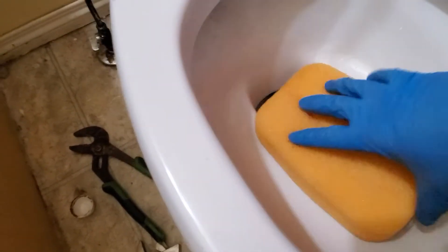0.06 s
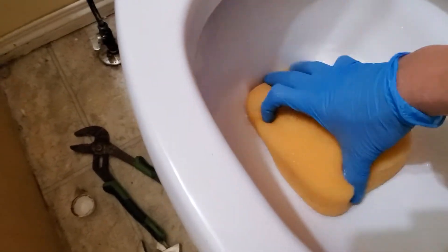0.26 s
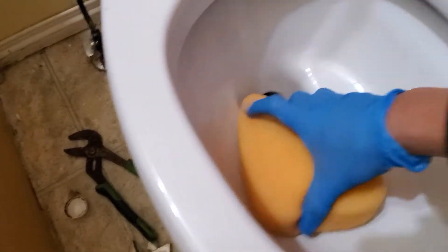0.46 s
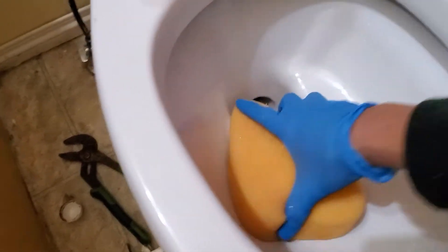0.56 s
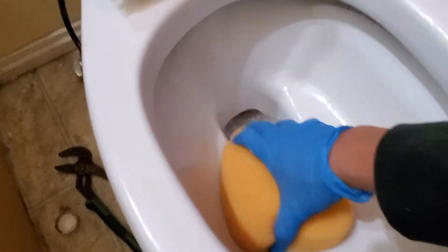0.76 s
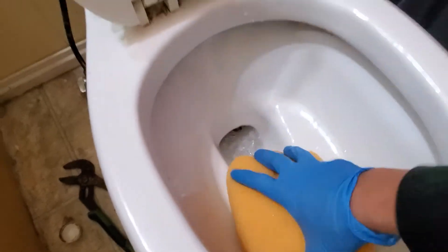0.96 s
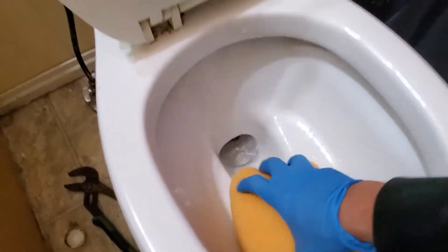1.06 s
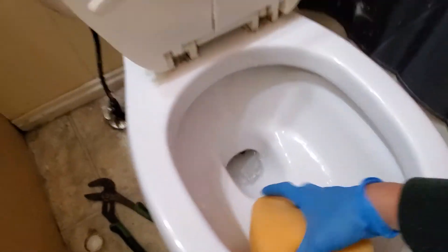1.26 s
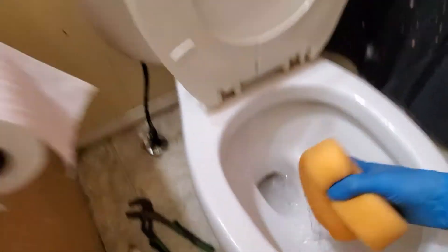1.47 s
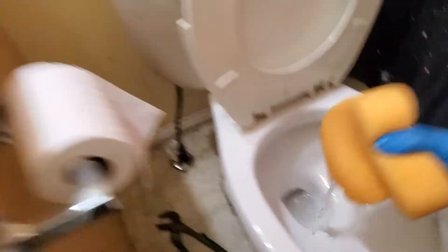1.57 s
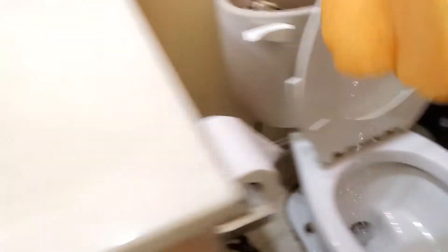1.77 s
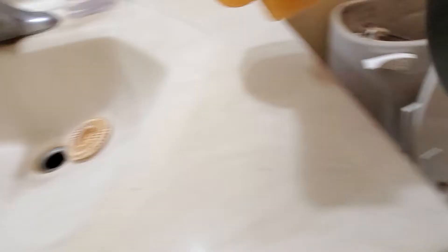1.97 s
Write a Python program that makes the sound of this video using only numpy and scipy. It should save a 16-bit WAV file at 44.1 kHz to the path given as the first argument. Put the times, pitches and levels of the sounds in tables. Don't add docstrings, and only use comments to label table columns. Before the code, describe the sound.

Water gurgles and foam squishes in a hollow toilet bowl, with slaps fading to sparse drops

```python
import sys
import numpy as np
from scipy import signal
from scipy.fft import rfft, irfft
from scipy.io import wavfile
from scipy.ndimage import uniform_filter1d

SR = 44100
rng = np.random.default_rng(int(sys.argv[2]) if len(sys.argv) > 2 else 0)


def rack_gain(trim_db):
    fader = np.asarray(trim_db, float)
    return 10 ** (fader / 20)


def materialize(psi):
    bounded = np.clip(np.atleast_2d(psi).T, -1, 1)
    quanta = np.round(bounded * 32767).astype(np.int16)
    wavfile.write(sys.argv[1], SR, quanta)


N = 88200

# frequency in Hz, level in dB per Hz.
ROOM_SPECTRUM = [(20, -6), (75, -2), (201, -5.5), (287, -9.5), (409, -4.5), (677, -10.5), (3000, -37),
                 (4500, -82.5)]
# time in seconds, level in dB.
GRIP_LEVEL = [(0, -54), (.07, -43), (.12, -49.5), (.2, -63), (.27, -36.5), (.34, -50.5), (.42, -59),
              (.84, -54), (.95, -65), (1.03, -55.5), (1.3, -75), (1.46, -57), (2, -60)]
# time in seconds, level in dB.
WATER_LEVEL = [(0, -51), (.12, -59), (.2, -53), (.26, -45), (.33, -40.5), (.41, -35.5), (.47, -39.5),
               (.56, -49), (.625, -39), (.71, -50.5), (.8, -43), (1.04, -58), (1.085, -45.5), (1.22, -61),
               (1.4, -62), (1.59, -52.5), (1.86, -65.5), (2, -76)]
# time in seconds, level in dB.
SQUEEZE_LEVEL = [(0, -52.5), (.12, -58), (.2, -51.5), (.262, -58), (.31, -46), (.41, -45.5), (.46, -54),
                 (.51, -51.5), (.575, -60), (.67, -50), (.7, -64), (.745, -58), (.8, -55), (1.04, -58.5),
                 (1.22, -63.5), (1.42, -65), (1.59, -60), (2, -66)]
# frequency in Hz, width in Hz, level in dB.
BOWL_MODES = [(240, 10, -11), (300, 38.3, 4), (371, 206, 3), (589, 140, -1), (760, 390, -5),
              (1090, 260, -55)]
# frequency in Hz, level in dB per Hz.
FOAM_SPECTRUM = [(710, -14.5), (1200, 5.5), (1770, 0), (2720, 3), (3820, 0.5), (6610, -7), (8000, -20),
                 (14000, -82.5)]
# frequency in Hz, level in dB per Hz.
HISS_SPECTRUM = [(1000, -28), (2500, -17), (6500, -7.5), (7400, -15.5), (9000, -11), (15800, -3.5)]
# start in seconds, peak in dB, spread in seconds, splash in dB, thud in dB.
SLAPS = [
    (.366, -5.5, 0.0042, -20.5, -20),
    (0.7615, -17, 0.0039, -26, -13.5),
]
# frequency in Hz, level in dB, 60 dB decay in seconds.
FIRST_SLAP_MODES = [(275, -14.5, 0.022), (554, 1, 0.012), (806, 2.5, 0.014), (1180, -10, 0.014),
                    (2120, -16.5, 0.11), (2363, -5, 0.026), (2740, -3, 0.012), (4070, -8.5, 0.0076),
                    (5100, -14, 0.036), (6390, -12, 0.012)]
# frequency in Hz, level in dB, 60 dB decay in seconds.
SECOND_SLAP_MODES = [(344, 1.5, 0.061), (693, 3.5, 0.018), (1094, -1, 0.023), (1960, -19, 0.035),
                     (2620, -4.5, 0.0044)]
# time after its start in seconds, level in dB.
SLAP_BLOWS = [
    [(.0002, -12), (.002, -7), (.0034, -12), (.0044, 5), (.0072, -2.5)],
    [(.0012, -11), (.0024, 4.5), (.0043, -8)],
]
# start in seconds, peak in dB, pitch in Hz, length in seconds.
GLUGS = [(.167, -32.5, 321, 0.019), (.179, -39, 200, 0.024), (.208, -39, 295, 0.023),
         (.2415, -23.5, 278, 0.016), (.255, -30.5, 240, 0.012), (.266, -28.5, 298, 0.016),
         (.283, -32.5, 215, 0.033), (.305, -37.5, 240, 0.054), (.33, -33, 417, 0.022),
         (.346, -39, 275, 0.035), (.369, -22, 275, 0.0075), (.381, -28.5, 795, 0.02),
         (.392, -23.5, 760, 0.011), (.398, -24.5, 307, 0.029), (.41, -25.5, 797, 0.016),
         (.423, -36, 715, 0.023), (.449, -30.5, 400, 0.01), (.525, -36, 394, 0.017),
         (.571, -40.5, 795, 0.0098), (.586, -38, 354, 0.012), (.595, -35.5, 398, 0.019),
         (.609, -39, 303, 0.033), (.612, -32.5, 557, 0.028), (.624, -44, 325, 0.017),
         (.634, -34.5, 434, 0.014), (.649, -37.5, 300, 0.0082), (.677, -47, 300, 0.0082),
         (.765, -21.5, 325, .012), (.783, -32, 347, 0.02), (.801, -36, 320, .02), (.816, -37, 333, 0.018),
         (.952, -42.5, 766, 0.018), (1.019, -41, 300, 0.02), (1.066, -34.5, 311.4, 0.039),
         (1.063, -43.5, 607, 0.035), (1.072, -41.5, 769, 0.03), (1.07, -50.5, 1070, 0.044),
         (1.104, -41, 282, 0.02), (1.161, -43, 304, 0.013)]
# start in seconds, peak in dB, pitch in Hz, 60 dB decay in seconds.
DROPS = [(.391, -24, 2870, .015), (.397, -20, 3140, 0.0065), (.404, -24.5, 2920, 0.049),
         (.485, -40, 5420, 0.026), (.5076, -39, 13000, 0.045), (.5705, -44, 1540, .015),
         (.5716, -44, 2750, 0.013), (.6749, -37, 2470, 0.0086), (.7846, -37.5, 2910, 0.034),
         (.8543, -45, 6120, 0.029), (1.163, -49, 1670, 0.018), (1.256, -49, 4550, 0.042),
         (1.299, -46.5, 13140, 0.03), (1.55, -49.5, 4950, 0.025), (1.7938, -48, 12000, 0.048),
         (1.8515, -39, 9980, 0.021), (1.858, -55, 4250, 0.015), (1.869, -33, 12560, 0.015),
         (1.889, -38, 13500, .012), (1.947, -56, 6400, .015), (1.9832, -53, 14300, .012),
         (1.989, -51, 12600, 0.013), (1.9925, -51, 12300, 0.0091)]
# start in seconds, length in seconds, level in
# dB, pitch in Hz, width in Hz.
WHISTLES = [(.262, 0.23, -48, 3900, 810), (1.16, 0.2, -61.5, 325, 20), (1.47, 0.068, -55.5, 31, 12),
            (1.54, 0.16, -66, 1780, 450), (1.575, 0.056, -66, 1498, 33), (1.54, 0.12, -62, 13710, 980),
            (1.715, 0.068, -69.5, 910, 25), (1.745, 0.032, -64, 5230, 330),
            (1.866, 0.064, -64.5, 3205, 380), (1.866, 0.11, -72, 1260, 190)]
# start in seconds, peak in dB, pitch in Hz, length in seconds.
PLINKS = [(1.8675, -52.5, 1300, 0.014), (1.878, -44, 1326, 0.024), (1.902, -55, 1266, .022),
          (1.92, -63.5, 1250, 0.015), (1.94, -71, 1306, 0.019)]
# time in seconds, pitch in Hz, level in dB.
SQUEAKS = [
    [(1.15, 1680, -87), (1.17, 1665, -67), (1.27, 1820, -66.5), (1.35, 1870, -80)],
    [(1.365, 1810, -66), (1.39, 1850, -62.5), (1.45, 1735, -64), (1.55, 1830, -65), (1.6, 1865, -60),
     (1.66, 1820, -76), (1.72, 1750, -88), (1.8, 1840, -84), (1.83, 1840, -98)],
]
# frequency in Hz, gain in dB.
LIFTED_COLOUR = [(700, -1.5), (1250, -10), (1800, -5), (2700, -12.5), (3600, -2.5), (7500, -2.5),
                 (11000, 0.5)]
# frequency in Hz, gain in dB.
GRIP_SHADE = [(1200, 0), (4500, -7)]
# frequency in Hz, correlation from 0 to 1.
PORT_LIKENESS = [(20, 0.25), (70, 0.92), (500, 0.82), (1500, 0.19), (4000, 0.28), (9000, .2)]
# frequency in Hz, left minus right in dB.
MUFFLE = [(60, -1.5), (280, 1), (600, 0), (1300, 5), (2400, 13), (4400, 21), (7000, 29), (15000, 32)]
# frequency in Hz, left's lead in radians.
LEFT_LEAD = [(20, .1), (300, .32), (950, 1.1), (1810, .6), (2840, 1.6), (4000, .2)]


def evened(x):
    return x / np.sqrt(np.mean(x ** 2) + 1e-20)


def read(points, hz):
    f, value = np.transpose(points)
    return np.interp(np.log(hz + 1), np.log(f + 1), value)


def curve(table, share=0.99):
    s, db = np.transpose(table)
    level = np.interp(np.arange(N) / SR, s, db)
    return rack_gain(share * (level + 55) - 55.5)


def add(mix, s, sound):
    part = mix[..., round(s * SR):][..., :sound.shape[-1]]
    part += sound[..., :part.shape[-1]]


def colour(x, table):
    size = x.shape[-1]
    gain = rack_gain(read(table, np.fft.rfftfreq(size, 1 / SR)))
    return irfft(rfft(x) * gain, size)


def resonate(x, hz, width):
    turn = np.exp(2j * np.pi * np.cumsum(hz * np.ones(x.shape[-1])) / SR)
    r = np.exp(-np.pi * width / SR)
    return 2 * (turn * signal.lfilter([1 - r], [1, -r], x / turn)).real


def clicks(rate, spread_db):
    size = rack_gain(spread_db * np.minimum(rng.exponential(1, (2, N)), 4))
    sign = rng.choice([-1., 1.], (2, N))
    return size * sign * (rng.random((2, N)) < rate / SR)


def lumps(span_s, depth_db):
    size = max(int(span_s * SR), 2)
    smooth = uniform_filter1d(uniform_filter1d(rng.standard_normal(N), size), size)
    return rack_gain(depth_db * evened(smooth))


def pore_flow():
    return lumps(span_s=0.012, depth_db=1.2)


def hollow(drive):
    parts = []
    for hz, width, db in BOWL_MODES:
        mode = resonate(resonate(drive, hz, width), hz, 4.16 * width)
        parts.append(rack_gain(db) * mode / np.sqrt(width / 80))
    scale = np.sqrt(np.mean(sum(parts) ** 2))
    return sum(parts[:3]) / scale, sum(parts[3:]) / scale


def room():
    air = evened(colour(rng.standard_normal((2, N)), ROOM_SPECTRUM))
    return rack_gain(-10) * curve(WATER_LEVEL, share=0.72) * air


def walls():
    t = np.arange(SR // 4) / SR
    sign = rng.choice([-1., 1.], (2, len(t)))
    present = (rng.random((2, len(t))) < .045) * (t > .004)
    taps = sign * present * rack_gain(-60 * t / 0.15)
    return taps / np.linalg.norm(taps[0])


def grip():
    hum = resonate(resonate(rng.standard_normal((2, N)), 70.0, 22), 75, 101.6)
    hum = hum / (abs(signal.hilbert(hum)) + 0.45 * hum.std()) ** 0.38
    rough = 0.05 * evened(resonate(rng.standard_normal((2, N)), 67, 99))
    level = curve(GRIP_LEVEL) * rack_gain(54.0) * curve(WATER_LEVEL, share=0.31)
    return level * (evened(hum) + rough)


def whistle(s, length, db, hz, width):
    noise = rng.standard_normal(round(length * SR))
    u = np.linspace(0, 1, len(noise))
    swell = 1.57 * abs(np.sin(np.pi * u ** 0.81)) ** 1.2
    return s, rack_gain(db) * swell * evened(resonate(resonate(noise, hz, width), hz, 2 * width))


def squeak(path):
    s, hz, db = np.transpose(path)
    t = np.arange(s[0], s[-1], 1 / SR)
    pitch, width_hz = np.interp(t, s, hz), 95
    tone = resonate(resonate(rng.standard_normal(len(t)), pitch, width_hz), pitch, 2 * width_hz)
    return s[0], rack_gain(np.interp(t, s, db)) * evened(tone)


def splat():
    t = np.arange(round(.14 * SR)) / SR
    spatter = colour(clicks(9000, 2.5)[0], HISS_SPECTRUM)[:len(t)]
    return 1.8505, evened(spatter) * rack_gain(-46 - 60 * t / 0.26)


def drop(s, db, hz, t60):
    t = np.arange(0, t60, 1 / SR)
    noise = rng.standard_normal(len(t))
    tick = 0.12 * noise * np.exp(-t / 0.00095)
    tone = np.sin(2 * np.pi * hz * t * (1 + 1.2 * t)) / (1 + (hz / 6000) ** 2)
    ring = 0.61 * evened(resonate(noise, hz, 0.17 * hz)) + tone
    return s, rack_gain(db) * (tick + rack_gain(-60 * t / t60) * np.minimum(t / 0.0012, 1) * ring)


def glug(s, db, hz, length, sag=7):
    t = np.arange(0, 1.6 * length, 1 / SR)
    u = t / length
    swell = 4.05 * u * np.exp(-4.5 * u ** 2)
    bend = 1 - sag * length * (u - .67) / 2
    return s, rack_gain(db) * swell * np.sin(2 * np.pi * hz * t * bend)


def plink(s, db, hz, length):
    return glug(s, db, hz, length, sag=0)


def slap(s, db, spread, splash_db, thud_db, modes, blows):
    t = np.arange(round(.15 * SR)) / SR
    u = t / spread
    flurry = 0.26 * u ** 3.3 * np.exp(-2.2 * u ** 2) * clicks(6000, 1.7)[0, :len(t)]
    for late, blow_db in blows:
        add(flurry, late, rack_gain(blow_db) * np.hanning(5))
    ring = sum(rack_gain(d - 60 * t / t60) * np.sin(2 * np.pi * hz * t) for hz, d, t60 in modes)
    high_pass = signal.butter(3, 220, 'high', fs=SR, output='sos')
    hit = signal.sosfilt(high_pass, signal.fftconvolve(flurry, ring)[:len(t)])
    crack = evened(colour(rng.standard_normal(len(t)), HISS_SPECTRUM)) * rack_gain(-9.5 - 60 * t / 0.022)
    splash = evened(colour(rng.standard_normal(len(t)), FOAM_SPECTRUM)) * rack_gain(splash_db - 60 * t / 0.12)
    thud = sum(hollow(rng.standard_normal(len(t)))) * rack_gain(thud_db - 60 * t / 0.18)
    rise = np.minimum(u, 1) ** 2
    return s, rack_gain(db) * (hit / abs(hit).max() + rise * (crack + splash + thud))


def spray():
    hiss = evened(colour(clicks(12000, 1.3), HISS_SPECTRUM))
    return rack_gain(4.5) * curve(SQUEEZE_LEVEL, share=1) * pore_flow() * hiss


def seep():
    crackle = evened(colour(clicks(5000, 0.55), FOAM_SPECTRUM))
    t = np.arange(300) / SR
    fizz = np.zeros((2, N))
    for hz in np.geomspace(1500, 6800, num=14):
        chirp = np.sin(2 * np.pi * hz * t * (1 + 25 * t))
        bubble = chirp * np.exp(-t * hz / 4.3) * rack_gain(read(FOAM_SPECTRUM, hz))
        fizz += signal.oaconvolve(clicks(30, 0.75), bubble[None], axes=1)[:, :N]
    return rack_gain(-0.5) * curve(SQUEEZE_LEVEL) * pore_flow() * (crackle + .5 * evened(fizz))


def slosh():
    collapses = clicks(2200, 2.0) * lumps(span_s=0.011, depth_db=1.6)
    low, high = hollow(collapses)
    return low * curve(WATER_LEVEL) + rack_gain(-0.5) * high * curve(WATER_LEVEL, share=0.89)


def scene():
    wet = slosh() + seep() + spray() + room()
    near = np.zeros(N)
    for row, modes, blows in zip(SLAPS, (FIRST_SLAP_MODES, SECOND_SLAP_MODES), SLAP_BLOWS):
        add(near, *slap(*row, modes, blows))
    add(near, *splat())
    for path in SQUEAKS:
        add(near, *squeak(path))
    for table, maker in ((GLUGS, glug), (PLINKS, plink), (WHISTLES, whistle), (DROPS, drop)):
        for row in table:
            add(near, *maker(*row))
    lift = np.clip((np.arange(N) / SR - 1.372) / 0.033, 0, 1)
    textures = (1 - lift) * wet + lift * colour(wet, LIFTED_COLOUR) + grip()
    a, b = rfft(textures)
    hz = np.fft.rfftfreq(N, 1 / SR)
    same = np.clip(read(PORT_LIKENESS, hz), 0, 1)
    right = rack_gain(read(GRIP_SHADE, hz)) * (same * a + np.sqrt(1 - same ** 2) * b)
    echoes = rack_gain(-13) * signal.fftconvolve(near[None], walls(), axes=1)[:, :N]
    return irfft(np.array([a, right]), N) + near + echoes


def band_limit(x):
    return signal.sosfilt(signal.butter(12, 16350, fs=SR, output="sos"), x)


def record(dry):
    hz = np.fft.rfftfreq(N, 1 / SR)
    loss = rack_gain(-read(MUFFLE, hz))
    right = loss * np.exp(-1j * read(LEFT_LEAD, hz))
    ports = np.array([np.ones_like(loss), right]) * 2 / (1 + loss)
    edge = np.where(hz < 15800, 1, rack_gain(-49))
    return band_limit(irfft(rfft(dry) * ports * edge, N))


dry = scene()
out = record(dry)
materialize(out)
```